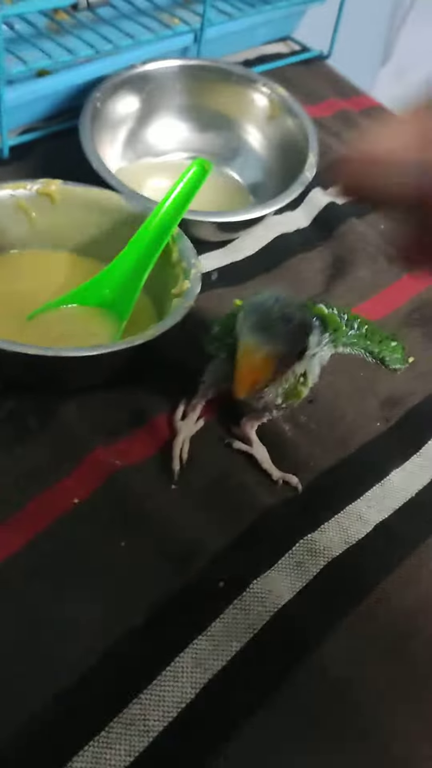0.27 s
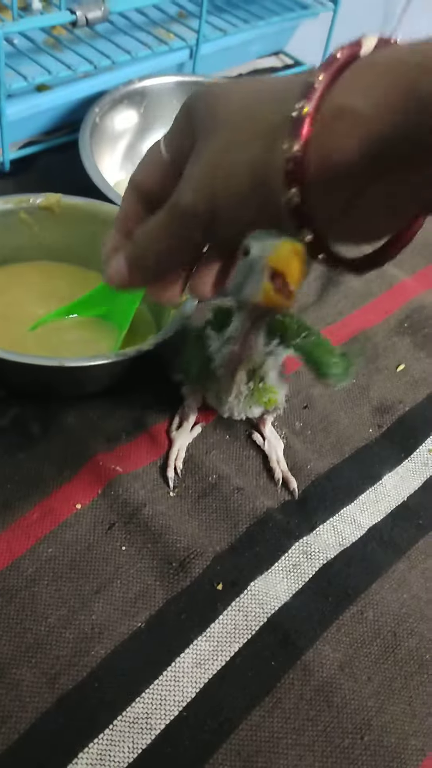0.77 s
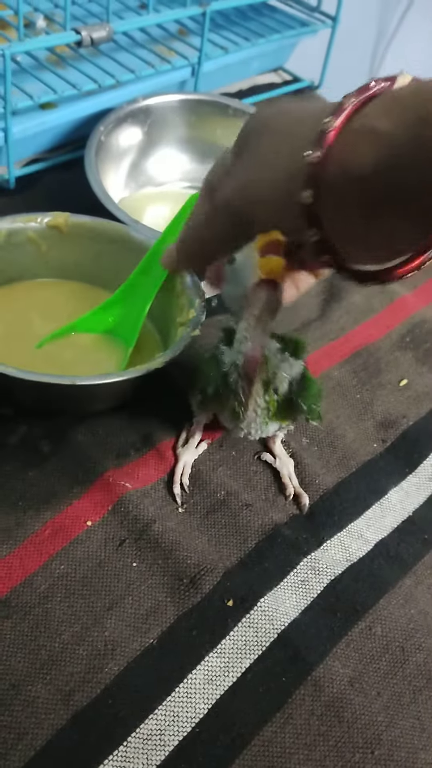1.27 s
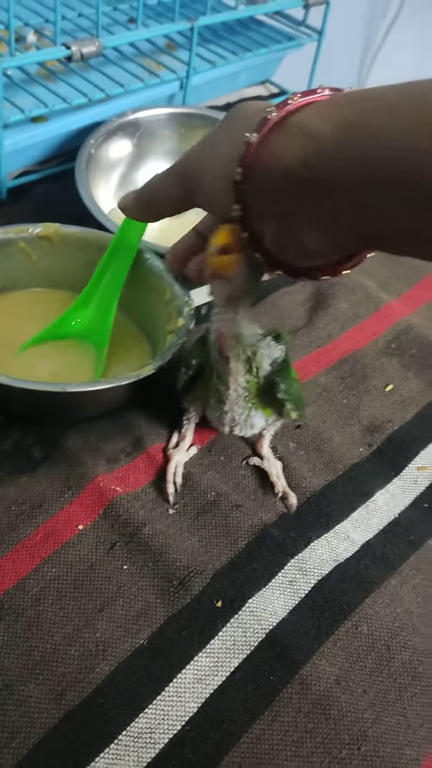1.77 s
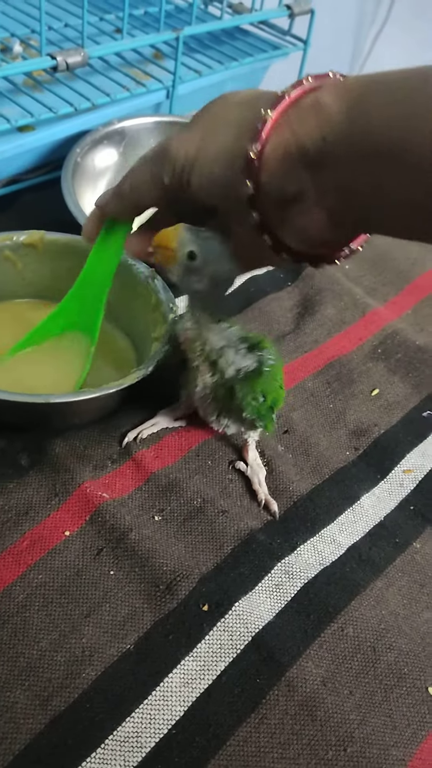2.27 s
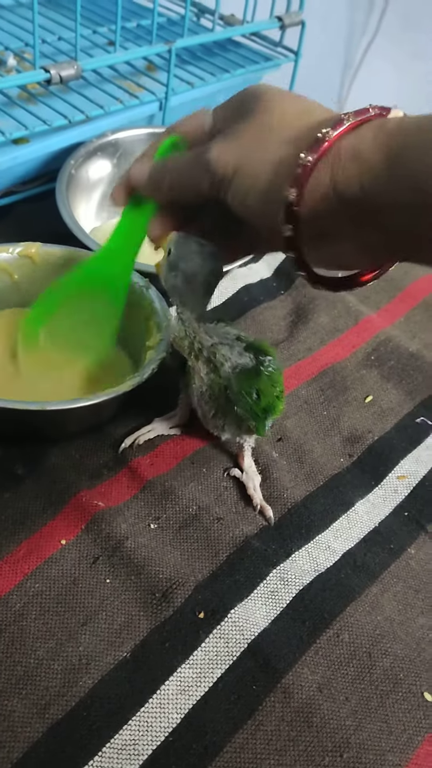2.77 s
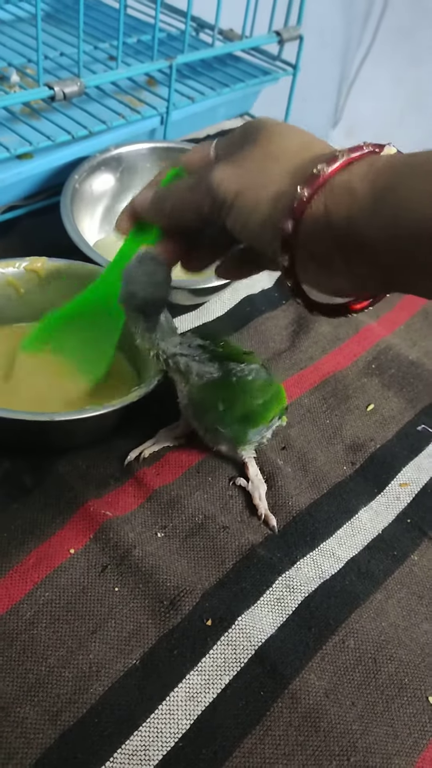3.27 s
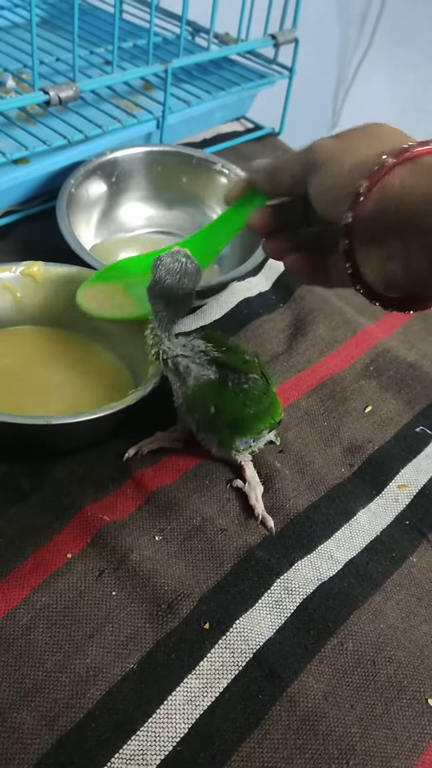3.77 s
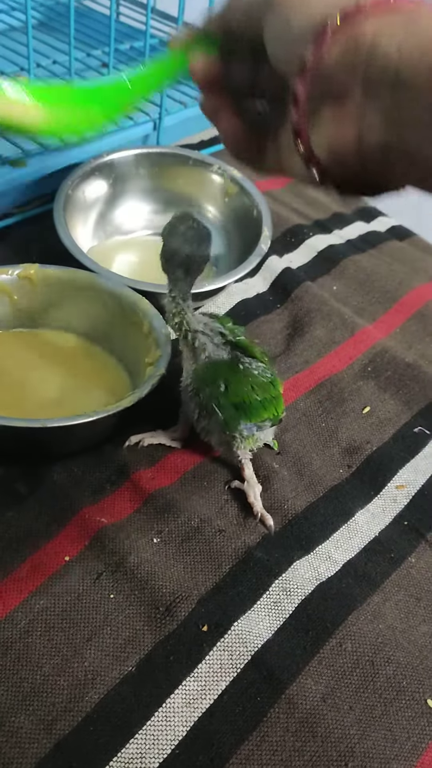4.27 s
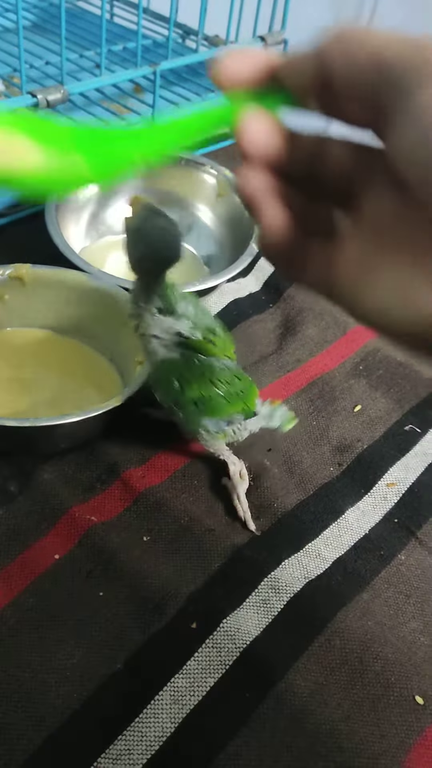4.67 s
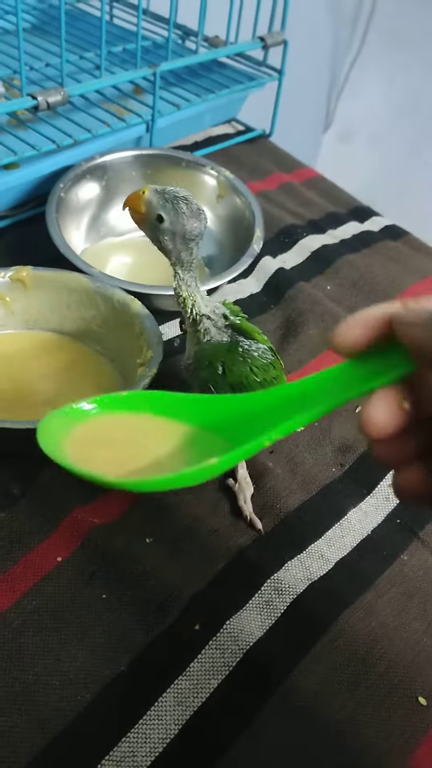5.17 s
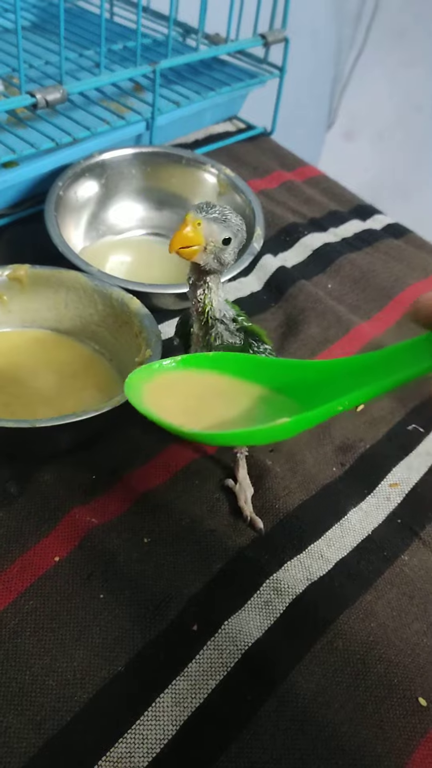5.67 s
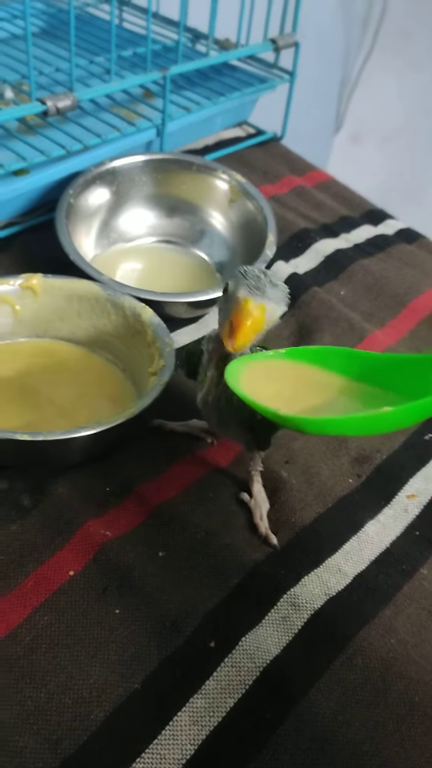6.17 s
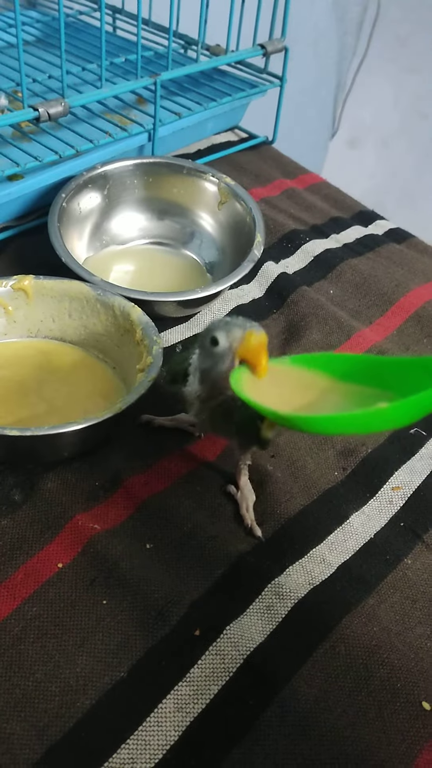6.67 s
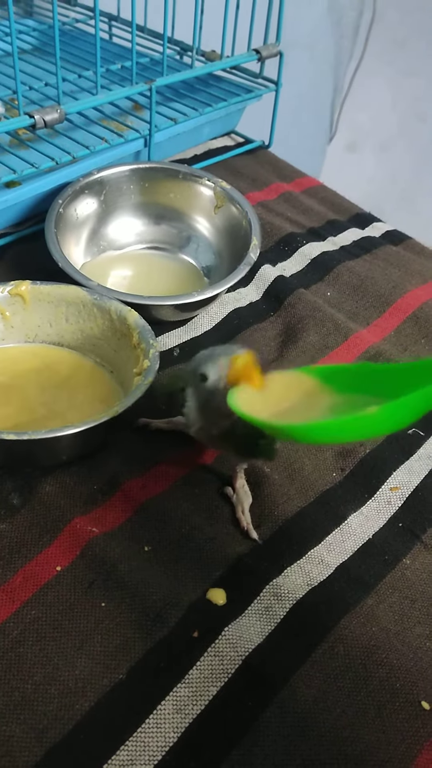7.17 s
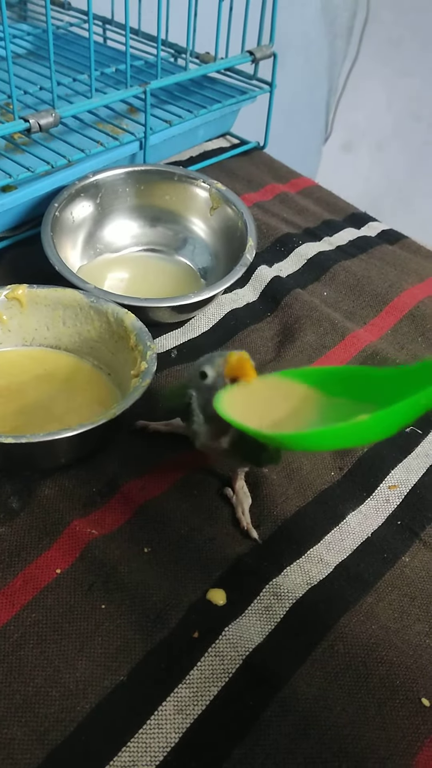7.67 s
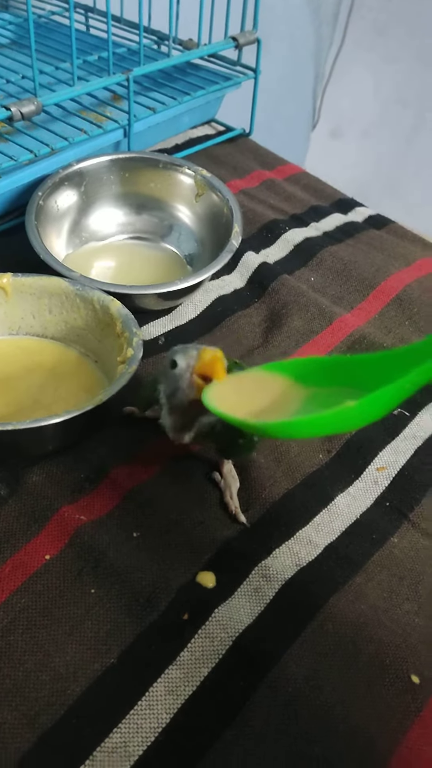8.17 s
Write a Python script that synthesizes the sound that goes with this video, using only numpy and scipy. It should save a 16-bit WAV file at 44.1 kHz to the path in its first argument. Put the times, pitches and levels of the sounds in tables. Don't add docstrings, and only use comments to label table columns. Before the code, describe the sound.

Short hoarse squawks sweep upward from hungry parrot chicks, one then two overlapping, close up, with a droning fan and soft bumps of draught.

```python
import sys
import numpy as np
from scipy import signal
from scipy.fft import rfft, irfft
from scipy.io import wavfile
from scipy.ndimage import uniform_filter1d

SR = 44100
rng = np.random.default_rng(int(sys.argv[2]) if len(sys.argv) > 2 else 0)


def wrap_up_sound(samples):
    columns = np.atleast_2d(samples).T
    tamed = np.clip(columns, -1, 1)
    steps = np.round(tamed * 32767).astype(np.int16)
    wavfile.write(sys.argv[1], SR, steps)


def amplitude_ratio(level_db):
    exponent = np.asarray(level_db, float) / 20
    return 10 ** exponent


N = 370881

# f/Hz, level/dB
RIGHT_PORT = [(100, -0.5), (3000, 3.5), (4200, 7), (6000, 6.5), (7400, -4.5), (7900, -26), (8300, -48),
              (8900, -42), (9300, -6), (10300, -5), (14100, 1), (14600, -42)]


def rms_one(x):
    return x / np.sqrt(np.mean(x ** 2) + 1e-20)


def in_time(rows, t):
    s, *columns = np.transpose(rows)
    return [np.interp(t, s, column) for column in columns]


def at_hz(points, hz):
    point_hz, value = np.transpose(points)
    return np.interp(np.log(hz + 1), np.log(point_hz), value)


def colour(x, points):
    size = 4096
    gain = amplitude_ratio(at_hz(points, np.fft.rfftfreq(size, 1 / SR)))
    cepstrum = irfft(np.log(gain))
    cepstrum[1:size // 2] *= 2
    cepstrum[size // 2 + 1:] = 0
    taps = irfft(np.exp(rfft(cepstrum)))[:1500]
    return signal.oaconvolve(x, taps)[:len(x)]


def resonance(x, hz, width_hz):
    r = np.exp(-np.pi * width_hz / SR)
    zeros = [(1 - r * r) / 2, 0, (r * r - 1) / 2]
    poles = [1, -2 * r * np.cos(2 * np.pi * hz / SR), r * r]
    return signal.lfilter(zeros, poles, x)


def drift(rate_hz):
    hop, settle = 40, 2000
    r = np.exp(-2 * hop * np.pi * rate_hz / SR)
    noise = rng.standard_normal(N // hop + 2 + settle)
    slow = signal.lfilter([1], [1, -2 * r, r * r], noise)[settle:]
    return np.interp(np.arange(N) / hop, np.arange(len(slow)), rms_one(slow))


def swells(t, rows, rest_db):
    power = amplitude_ratio(2 * rest_db)
    for s, peak_db, half_s in rows:
        power = power + amplitude_ratio(2 * peak_db) * np.exp(-2 * ((t - s) / half_s) ** 2)
    return np.sqrt(power)


def fan(t):
    # f/Hz, level/dB
    hiss_spectrum = [(60, 1), (200, -3.5), (400, -9), (680, -15), (950, -12.5), (2000, -23.5), (3000, -31),
                     (5000, -35), (9000, -33), (15000, -47.5)]
    # f/Hz, correlation
    likeness = [(60, 0.011), (240, 0.72), (950, -0.11), (3770, -0.22), (15000, -0.19)]
    # t/s, level/dB
    tone_swells = [(.31, -47.5), (0.939, -43), (1.95, -51), (2.83, -44.5), (3.7, -49.5), (4.239, -45.5),
                   (5.42, -46.5), (6.22, -38.5), (7.11, -50)]
    hiss_db, drone_db, drone_hz, swell_s = -49.5, -61, 193.7, 0.059

    hz = np.fft.rfftfreq(N, 1 / SR)
    alike = np.clip(at_hz(likeness, hz), -1, 1)
    mid, side = rfft(rng.standard_normal((2, N))) * amplitude_ratio(at_hz(hiss_spectrum, hz)) * (hz > 30)
    hiss = irfft(np.sqrt(1 + alike) * mid + np.sqrt(1 - alike) * side * [[1], [-1]], N)

    tone_hz = drone_hz + 1.1 * drift(2.1)
    tone = np.sin(2 * np.pi * np.cumsum(tone_hz) / SR)
    rows = [(s, level_db, swell_s) for s, level_db in tone_swells]
    throb = swells(t, rows, drone_db) * amplitude_ratio(1.1 * drift(2.4))
    return amplitude_ratio(hiss_db + 1.6 * drift(2.7)) * rms_one(hiss) + throb * tone


def draught(t):
    # t/s, peak level/dB, half length/s
    left_gusts = [(.2, -39.5, 0.17), (0.537, -31.5, 0.1), (0.8, -36, 0.094), (.97, -37, 0.052),
                  (1.128, -47, 0.056), (1.383, -30.5, 0.073), (1.65, -43, 0.36), (2.094, -45, 0.13),
                  (2.6, -46.5, 0.098), (2.789, -34, 0.11), (3.047, -47.5, 0.085), (3.464, -32.5, .13),
                  (4.115, -38, 0.19), (4.369, -31, 0.1), (4.8, -41, 0.12), (5.07, -44.5, 0.11),
                  (5.46, -41.5, 0.081), (5.661, -39.5, 0.13), (6.264, -46, 0.22), (6.75, -39.5, 0.078),
                  (7.07, -27, 0.091), (7.4, -32, .13), (7.68, -40.5, 0.18), (8.29, -43, 0.21)]
    # t/s, peak level/dB, half length/s
    right_gusts = [(1.8, -50.5, 0.12), (4.45, -42, 0.081), (5.454, -40.5, .07), (7.64, -43.5, 0.052),
                   (8.198, -48, 0.047)]
    left_lull_db, right_lull_db, casing_db = -55, -60, -11.5
    # f/Hz, level/dB
    eddy = [(12, -19), (30, 4.5), (90, -1.5), (200, -11), (400, -30.5), (900, -60.0), (3000, -99.5)]

    left, right = [amplitude_ratio(5.3 * drift(14)) * rms_one(colour(rng.standard_normal(N), eddy)) for port in "LR"]
    left = swells(t, left_gusts, left_lull_db) * left
    right = swells(t, right_gusts, right_lull_db) * right
    shake = signal.butter(2, 190, "high", fs=SR, output="sos")
    return np.array([left, right + amplitude_ratio(casing_db) * signal.sosfilt(shake, left)])


def small_noises(t):
    # t/s, peak level/dB, f/Hz
    ticks = [(0.1324, -41, 4260), (0.561, -48, 4720), (0.754, -47.5, 5750), (0.9372, -41, 4460),
             (1.2994, -54, 4460), (1.7664, -44, 5400), (2.5, -62, 3820), (3.108, -51, 4820),
             (5.7994, -49, 3900), (6.0926, -71, 4690), (6.9733, -48.5, 4500), (6.984, -63, 3700),
             (7.222, -55, 4970), (7.3482, -50.5, 5320), (7.6056, -54.5, 4730), (8.347, -49, 4040)]
    # t/s, length/s, level/dB
    rustles = [(0.556, 0.038, -82.5), (1.294, .03, -65), (2.506, 0.022, -75.5), (3.245, 0.06, -69.5),
               (3.485, 0.056, -67.5), (4.197, 0.046, -71), (6.109, 0.066, -69)]

    out = np.zeros(N)
    age_s = np.arange(200) / SR
    for s, peak_db, hz in ticks:
        burst = np.sin(2 * np.pi * hz * age_s) + 0.6 * rng.standard_normal(len(age_s))
        out[round(s * SR):][:len(age_s)] += amplitude_ratio(peak_db - 2.0) * burst * np.exp(-age_s / 0.00053)

    swell = sum(amplitude_ratio(level_db) * np.exp(-((t - s) / length_s * 1.4) ** 2) for s, length_s, level_db in rustles)
    cloth = rms_one(resonance(rng.standard_normal(N), 5100, 5500))
    return out + swell * amplitude_ratio(3.3 * drift(60)) * cloth


def outline(glide, hoarse, slips, push_db, breaks):
    scoop_s, scoop_pitch, scoop_db = .035, .78, -6
    hook_s, hook_lift_hz, hook_db = .014, 167.1, 2
    break_s, break_hz, break_db, hold_s, sag_db = 0.0072, 2690, 3, .009, 1
    slack_s, slack_hz = .023, 766

    (start, low_hz, soft_db), (s, hz, level_db) = glide[0], glide[-1]
    lasting_s, chaos, depth = hoarse
    share = min(lasting_s / scoop_s, 1)
    scoop = [(start, scoop_pitch ** share * low_hz, soft_db + share * scoop_db),
             (start + share * scoop_s, low_hz, soft_db)]
    if breaks:
        jump = s + 2 * break_s
        ending = [(s + break_s, hz + 100, level_db + break_db),
                  (jump, break_hz, level_db + break_db),
                  (jump + hold_s / 2, break_hz + 80, level_db + sag_db),
                  (jump + hold_s, break_hz, level_db)]
        last = (s + break_s, s + 1, .47, 2, .35)
    else:
        ending = [(s + hook_s, hz + hook_lift_hz, level_db + hook_db)]
        last = (s + hook_s + slack_s / 2, s + 1, .3, 1, 0)
    ending.append((ending[-1][0] + slack_s, slack_hz, level_db + push_db))
    steady = (start, s, .05, 2, .08)
    return scoop + list(glide[1:]) + ending, [steady, (start, start + lasting_s, chaos, 2, depth), *slips, last]


def syrinx(t, pitch_hz, slips):
    cycles = np.cumsum(pitch_hz) / SR
    k = np.arange(1, int(cycles[-1]))
    at_s = np.interp(k, cycles, t)
    early, linger, size = rng.standard_normal((3, len(k)))
    chaos, pattern = np.full(len(k), .025), np.zeros(len(k))
    for start, end, wild, pulses, depth in slips:
        inside = (at_s >= start) & (at_s < end)
        chaos[inside] = wild
        pattern[inside] = depth * np.cos(2 * np.pi * k[inside] / round(pulses))

    wobble = signal.lfilter([1], [1, -.85], chaos * linger)
    shifted = k + .14 * pattern + .11 * chaos * early + .05 * wobble
    at = np.interp(shifted, cycles, np.arange(len(t)))
    sizes = (1 + .25 * pattern) * amplitude_ratio(5 * chaos * size)

    near = np.arange(-12, 13)
    spots = at.astype(int)[:, None] + near
    shapes = np.sinc(spots - at[:, None]) * np.hanning(27)[1:-1]
    out = np.zeros(len(t) + 24)
    np.add.at(out, spots + 12, sizes[:, None] * shapes)
    return out[12:-12], cycles


def cry(rows, posture, slips):
    # f/Hz, level/dB
    throat = [(400, -43.5), (700, -7), (900, -5.5), (1300, -10.5), (1800, 1), (2300, -5.5), (2650, -3.5),
              (3050, -7), (3500, -2.5), (4100, 2.5), (6200, -4.5), (8300, -8), (9600, -22), (11000, -15),
              (15000, -19)]
    breath_fade_db = -7
    beak_hz, beak_db, chest_db, treble_db, left_db, lag_ms, breath_db = posture

    first = round(rows[0][0] * SR)
    t = np.arange(first, round(rows[-1][0] * SR) + 400) / SR
    pitch_hz, level_db = in_time(rows, t)
    (top_s, top_hz, _), (end_s, end_hz, _) = rows[-2:]
    slack = np.clip((t - top_s) / (end_s - top_s), 0, 1)
    pitch_hz = uniform_filter1d(pitch_hz + (end_hz - top_hz) * (slack ** 2.0 - slack), size=180)
    pulses, cycles = syrinx(t, pitch_hz, slips)

    puffs = rng.standard_normal(len(t)) * (1 + .6 * np.cos(2 * np.pi * cycles))
    progress = (t - t[0]) / (end_s - t[0])
    breath = amplitude_ratio(breath_db + breath_fade_db * (progress - .5)) * puffs
    voice = colour(rms_one(pulses) + breath, throat)
    beak = (amplitude_ratio(beak_db) - 1) * resonance(voice, beak_hz, 902)
    chest = (amplitude_ratio(chest_db) - 1) * resonance(voice, 1547, 1400)
    voice = voice + beak + chest
    voice = voice + (amplitude_ratio(treble_db) - 1) * resonance(voice, 12000, 6000)

    heard = colour(voice, RIGHT_PORT)
    voice = voice / np.sqrt(uniform_filter1d(heard ** 2, size=1100) + 1e-9)
    edges = np.clip((t - t[0]) / 0.0062, 0, 1) * np.clip((end_s - t) / 0.0025, 0, 1)
    voice = voice * amplitude_ratio(level_db) * edges

    late = np.sinc(np.arange(48) - 12 - lag_ms * SR / 1000) * np.hanning(48)
    out = np.zeros((2, N))
    out[0, first:first + len(t)] = amplitude_ratio(left_db) * voice
    out[1, first:first + len(t)] = np.convolve(voice, late)[12:12 + len(t)]
    return out


def chicks():
    # t/s, pulse rate/Hz, level/dB
    hooked = [
        [(0.15, 1107, -23), (0.21, 1223, -22), (0.26, 1426, -20), (0.297, 1612, -24.5), (0.33, 1840, -19),
         (0.367, 1946, -20)],
        [(0.95, 1237, -25), (1.05, 1337, -17), (1.1, 1383, -20), (1.16, 1735, -24.5), (1.211, 1835, -26)],
        [(1.81, 1156, -21.5), (1.88, 1268, -21.5), (1.92, 1408, -29.5), (1.96, 1643, -27.5), (2.015, 1781, -29),
         (2.03, 1950, -25.5)],
        [(2.694, 1171, -27.5), (2.77, 1238, -23), (2.81, 1450, -29), (2.85, 1680, -29.5), (2.911, 1953, -27)],
        [(2.8, 1216, -28), (2.9, 1445, -28.5), (2.987, 1661, -40)],
        [(3.654, 1115, -22), (3.74, 1308, -17), (3.83, 1776, -21), (3.869, 1910, -24)],
        [(5.374, 1209, -24), (5.43, 1261, -20), (5.465, 1422, -21.5), (5.543, 1886, -26.5)],
        [(6.568, 1850, -27.5), (6.605, 1880, -31.5)],
        [(7.734, 1188, -26), (7.81, 1255, -23), (7.895, 1854, -32.5), (7.922, 1854, -27.5)],
    ]
    # t/s, pulse rate/Hz, level/dB
    breaking = [
        [(4.484, 1193, -24), (4.55, 1221, -20.5), (4.595, 1411, -22), (4.64, 1664, -19.5), (4.675, 1740, -21),
         (4.73, 1620, -24.5), (4.771, 1697, -28)],
        [(5.47, 1168, -27.5), (5.54, 1256, -23.5), (5.558, 1311, -30), (5.57, 1362, -20), (5.61, 1553, -31),
         (5.66, 1627, -26.5)],
        [(6.365, 1054, -18.5), (6.44, 1149, -21), (6.48, 1328, -14), (6.52, 1445, -17), (6.575, 1512, -25.5)],
        [(7.78, 1189, -19.5), (7.855, 1335, -17.5), (7.9, 1471, -20), (7.94, 1546, -27), (7.984, 1560, -24)],
    ]
    # length/s, chaos 0-1, strong-weak depth 0-1
    hoarse = [(.068, .45, .3), (.088, .45, .2), (.04, .8, .1), (.028, .6, .1), (.23, .7, 0),
              (.166, .45, .15), (.012, .6, 0), (.045, .4, 0), (.028, .65, 0), (.028, .65, 0), (.06, .2, .1),
              (.035, .45, .3), (.075, .3, .2)]
    # from/s, to/s, chaos 0-1, pulses per pattern, pattern depth 0-1
    slips = [
        [(.298, .328, .05, 4, .6), (.328, .37, .08, 2, .5)],
        [(1.04, 1.14, .22, 4, .15), (1.14, 1.212, .14, 2, .65)],
        [(1.85, 1.885, .3, 2, .25), (2.017, 2.036, .1, 2, .3)],
        [(2.722, 2.775, .2, 2, .15)],
        [],
        [(3.82, 3.87, .3, 2, .35)],
        [(5.468, 5.59, .55, 2, .1)],
        [],
        [(7.765, 7.81, .18, 2, .05), (7.81, 7.94, .4, 2, .1)],
        [(4.595, 4.675, .25, 2, .7), (4.675, 4.73, .45, 2, .3)],
        [],
        [],
        [(7.955, 7.988, .05, 2, .4)],
    ]
    # resonance f/Hz, its lift/dB, chest tone/dB, push of the closing fall/dB
    beak = [(4000, 7, -3.5, -6.5), (3937, 6.5, 3, -5), (3800, 4, -1.5, 0.5), (4740, 5.5, 0.5, -0.5),
            (4300, -1.5, -6.5, 1.5), (6080, 13.5, 0.5, 2), (3930, 5, -4.5, 7.5), (4260, 4.5, -2, 7),
            (4540, -1, -5.5, 6.5), (4970, 9.5, -2, 3), (3800, 9.5, 4, -2.5), (3900, 8.5, 3.5, -1),
            (4100, 11, 6.5, -4.5)]
    # treble/dB, left against right/dB, right lag/ms, breathiness/dB
    facing = [(0, -5.5, 0.14, -26), (-4, -1, 0.205, -10.5), (-7.5, -4.5, 0.181, -41), (6, -5, 0.12, -12),
              (-9, -1.5, 0.094, -8), (2.5, -6, 0.0042, -2.5), (2, -4, 0.13, -17), (-20.5, -1, 0.063, 6),
              (-1, -4, 0.098, -6), (0, -2.5, 0.1, -15.5), (5.5, -4, 0.188, -30), (4, -2.5, 0.18, -11),
              (4.5, -4, 0.12, -15)]

    out = np.zeros((2, N))
    for k, glide in enumerate(hooked + breaking):
        *tone, push_db = beak[k]
        rows, states = outline(glide, hoarse[k], slips[k], push_db, breaks=k >= len(hooked))
        out += cry(rows, (*tone, *facing[k]), states)
    return out


def room(x):
    t60_s, tail_db, close_db = 0.29, -15.5, -2
    age_s = np.arange(round(.6 * SR)) / SR
    bright, dull, close = rng.standard_normal((3, 2, len(age_s)))
    dull = signal.lfilter([.35], [1, -.65], dull)
    tail = 0.1 * bright * amplitude_ratio(-60 * age_s / (0.85 * t60_s)) + dull * amplitude_ratio(-60 * age_s / t60_s)
    tail = tail * np.clip(age_s / 0.016, 0, 1)
    close = close ** 3 * amplitude_ratio(-60 * age_s / .018) * (age_s > .0004)
    echoes = amplitude_ratio(tail_db) * tail / np.sqrt(np.sum(tail ** 2, axis=1, keepdims=True))
    echoes += amplitude_ratio(close_db) * close / np.sqrt(np.sum(close ** 2, axis=1, keepdims=True))
    return np.array([signal.oaconvolve(side, echo)[:N] for side, echo in zip(x, echoes)])


def scene():
    # f/Hz, level/dB
    left_port = [(100, -5.5), (3000, 6), (4200, -3), (6000, -1), (8600, -0.5), (9100, -22), (9500, -34),
                 (9900, -24), (10400, -3.5), (14200, 4.5), (14600, -49.5)]
    t = np.arange(N) / SR
    near = small_noises(t) + chicks()
    left, right = near + room(near) + fan(t)
    return np.array([colour(left, left_port), colour(right, RIGHT_PORT)]) + draught(t)


def band_limit(x):
    return signal.sosfilt(signal.butter(12, 15630, fs=SR, output="sos"), x)


def record(dry):
    wake_db = np.interp(np.arange(N) / SR, [0, .062, .08, .15, .2], [-88, -74, -14, -5.0, 0.0])
    return band_limit(dry * amplitude_ratio(wake_db))


dry = scene()
out = record(dry)
wrap_up_sound(out)
```